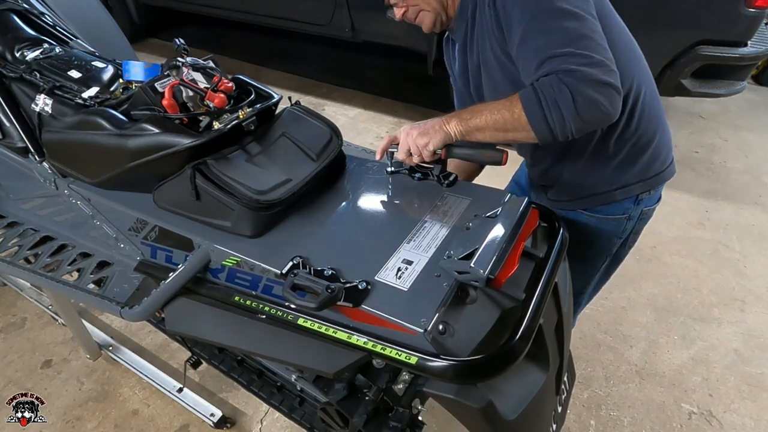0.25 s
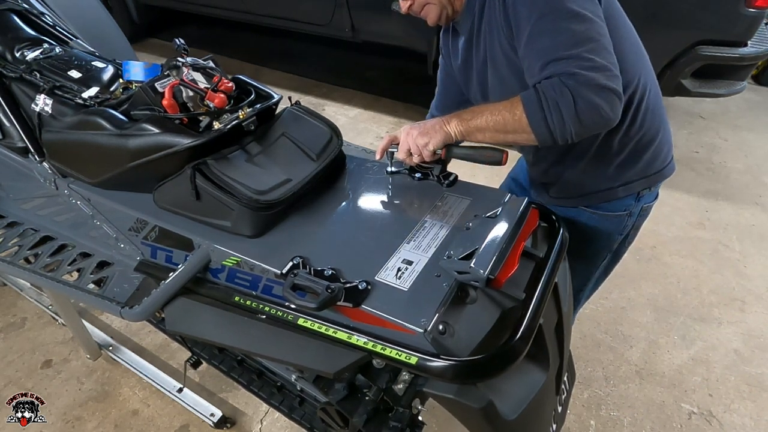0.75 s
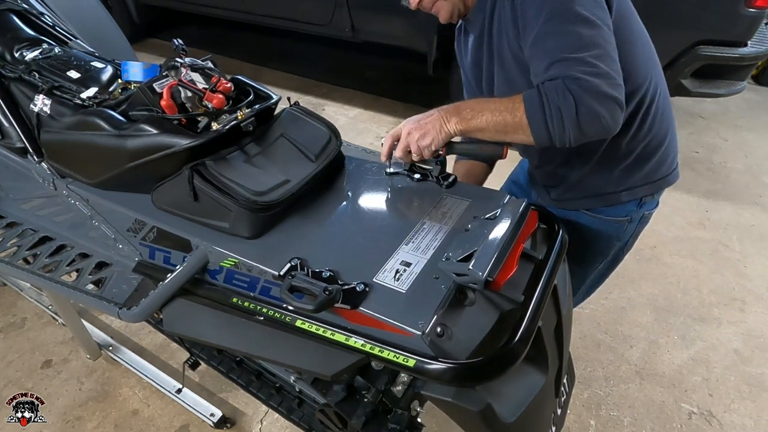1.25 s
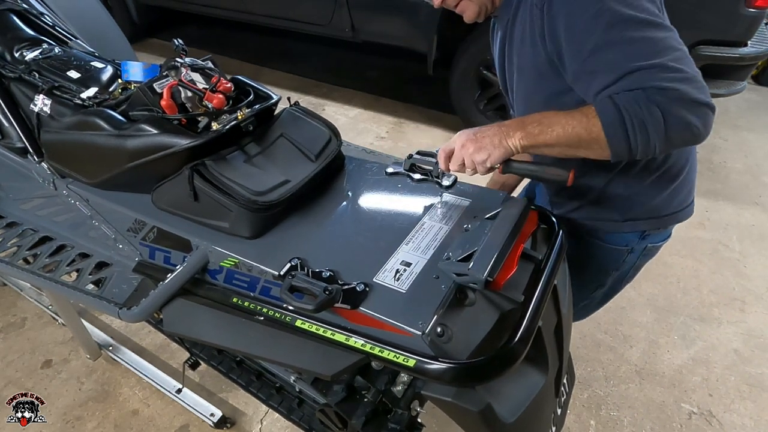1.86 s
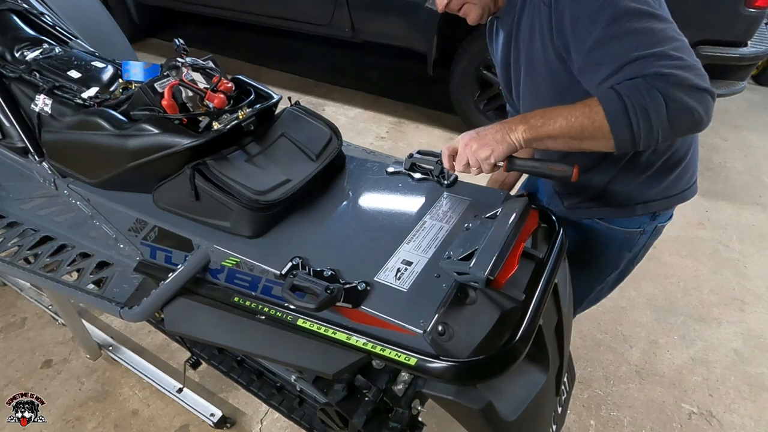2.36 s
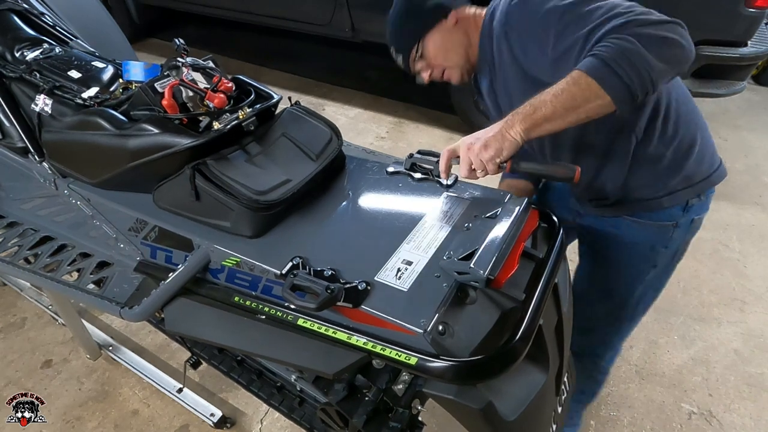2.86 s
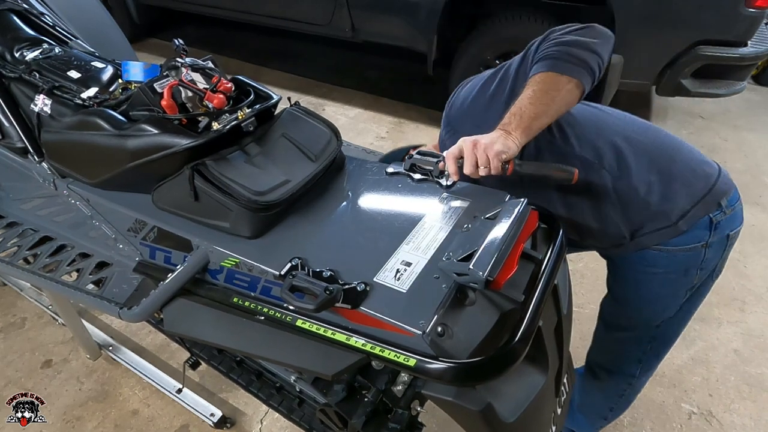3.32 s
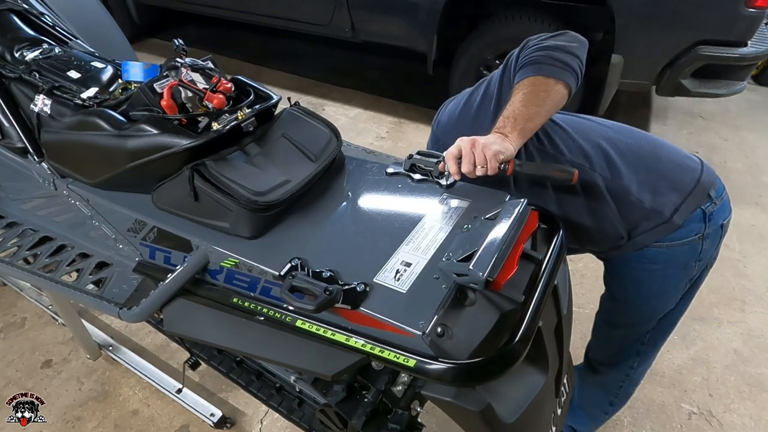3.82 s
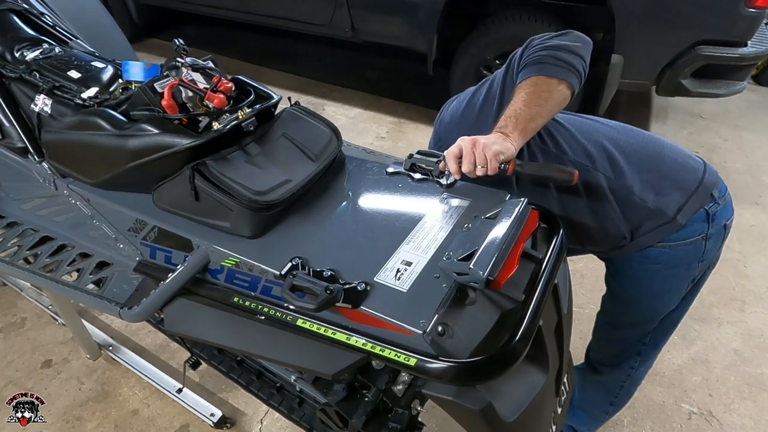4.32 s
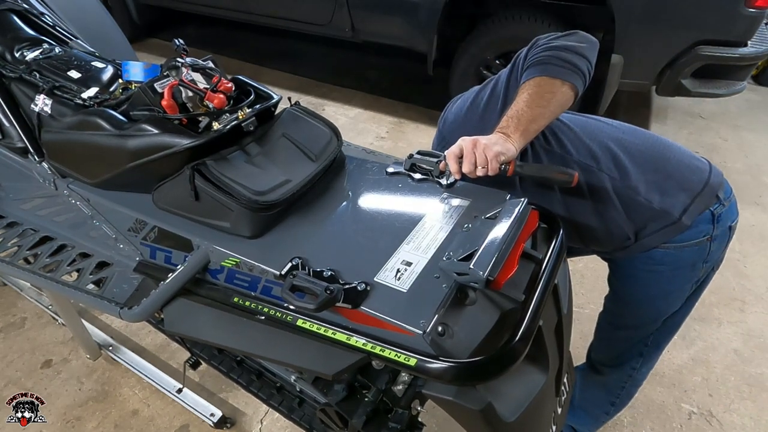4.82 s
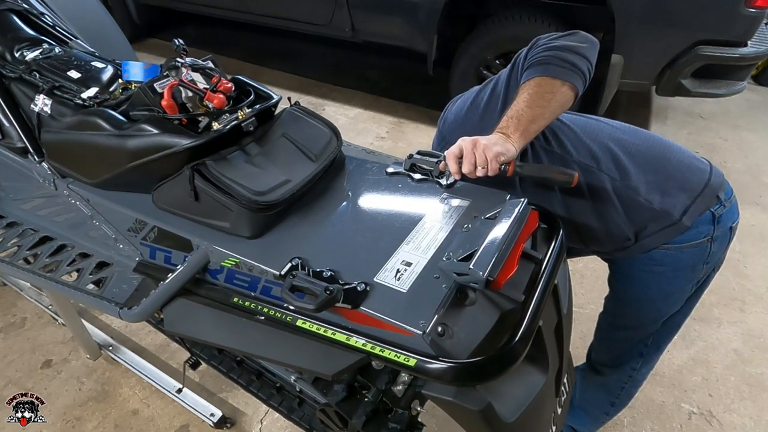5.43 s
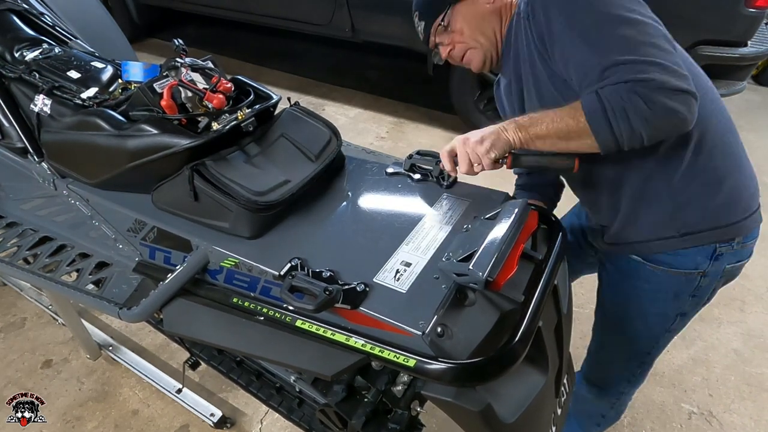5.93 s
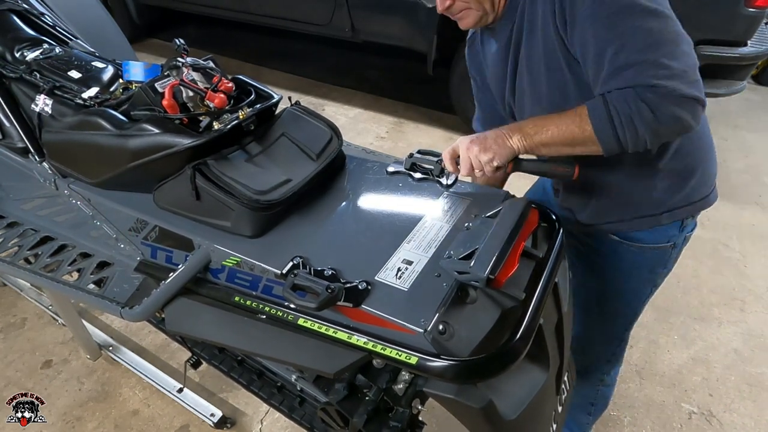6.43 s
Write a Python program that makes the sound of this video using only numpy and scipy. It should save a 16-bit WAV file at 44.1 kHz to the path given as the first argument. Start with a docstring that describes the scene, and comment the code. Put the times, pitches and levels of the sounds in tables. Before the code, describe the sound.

A hand ratchet and socket clank, click and scrape irregularly on a hollow sheet-metal deck in a bare garage.

```python
"""A short scrape runs into a steel clank: a hand ratchet and its socket knock, click and slide on a
hollow sheet-metal vehicle deck in a bare garage. Each knock booms in the deck, rings the steel parts
and dies in the room; the sliding socket adds grainy friction. A mains hum and a hiss lie underneath.
Near the end the sound drops out, returns faintly and flickers."""
import sys
import numpy as np
from scipy import signal
from scipy.fft import rfft, irfft, next_fast_len
from scipy.io import wavfile
from scipy.ndimage import map_coordinates

SR = 44100
rng = np.random.default_rng(int(sys.argv[2]) if len(sys.argv) > 2 else 0)


def generate_wav(signal):
    """Clip the signal to [-1, 1] and save it as 16-bit WAV at the path in sys.argv[1]."""
    frames = np.transpose(np.atleast_2d(signal))
    scaled = np.clip(frames, -1, 1) * 32767
    pcm = np.round(scaled).astype(np.int16)
    wavfile.write(sys.argv[1], SR, pcm)


N = 294586
FFT_SIZE = 2 ** 16
BIN_HZ = np.fft.rfftfreq(FFT_SIZE, 1 / SR)

# Knock cues; levels are faders ahead of each layer's trim: (time [s], deck [dB], frame [dB], plate [dB],
# handle [dB], socket [dB], pawl [dB], tip [dB], tilt toward each part's higher modes [dB],
# favoured pitch [Hz], room send [dB])
KNOCK_CUES = [(0.084, -28.5, -24.5, -29.5, -21, -20, -19.5, -24, 1.5, 1830, -2.5),
              (0.2757, -68, -77, -67, -61, -33, -35.5, -35, 4, 5550, -9.5),
              (0.422, -35, -55, -39, -30, -26.5, -31.5, -53, -2, 1750, 1.5),
              (0.4342, -26, -34, -33.5, -33, -31, -25.5, -39, 5, 2110, -10.5),
              (0.4567, -50.5, -36, -36, -29, -32, -38, -62, 9.5, 3070, -5),
              (0.963, -48.5, -39, -44, -56, -66, -67, -82.5, 3, 427, -3.5),
              (1.0365, -22, -35.5, -57, -62, -65, -70, -85, -4, 338, -2),
              (1.056, -39, -35, -42.5, -47.5, -55, -61.5, -78, 0.5, 616, -5),
              (1.0864, -35.5, -31, -46, -45, -62, -73, -82.5, -5, 338, -1.5),
              (1.1566, -21.5, -27, -27.5, -35, -33, -30, -41.5, 10, 620, -13),
              (1.1657, 1, -21, -28, -15.5, -11, -4.5, -28.5, 2, 3340, -6.5),
              (1.1835, -19, -10, -20, -15, -16, -30, -51.5, 1.5, 3100, -3.5),
              (1.2097, -2, -15, -21, -16, -17, -45, -54.5, 7, 628, -2),
              (1.2297, -4, -5.5, -9, -1, -2.5, -7, -45.5, 0, 987, -6),
              (1.3887, -45, -46, -26.5, -20, -24, -40, -70.5, 5, 1750, -9),
              (1.4849, -56.5, -53, -55, -45, -43, -38, -63, 7, 6600, -10.5),
              (1.569, 8, -10.5, -27.5, -9, 0, -5.5, -16, 4, 2110, 0.5),
              (1.9092, -21, -17.5, -50, -32, -34.5, -48, -47, -3.5, 429, -5.5),
              (2.1607, -4.5, -6.5, -4, -5, -7, -28, -31.5, 0, 431, -3),
              (2.3413, -15.5, -18, -15, -12.5, -25, -53, -53, 1.5, 620, -5.5),
              (2.358, -9, -14, -16, -17.5, -24.5, -51, -55.5, -1, 419, -7.5),
              (2.5573, 1, -7, -7.5, -8, -12.5, -14.5, -55.5, -1.5, 440, -4),
              (2.7559, -23, -26, -36.5, -27, -33, -40, -45, -1, 4420, -2),
              (2.9971, -41, -27, -49, -42, -43, -31.5, -40, 1, 545, 3),
              (3.0275, -36.5, -38, -47, -33, -30.5, -29, -40, 5, 3880, 3),
              (3.1398, -25, -34, -33, -37, -46, -46, -46, 2.5, 620, -11.5),
              (3.5104, -63, -64, -40.5, -46.5, -39, -41, -51, 1.5, 1750, 10.5),
              (4.0142, -64, -43.5, -32, -36, -30, -34.5, -34.5, -1, 1020, 7),
              (4.1523, -48, -41, -27.5, -30.5, -33, -37, -67, -2, 784, -2),
              (4.7649, -25, -30, -43, -18.5, -20.5, -33, -22.5, -1, 3100, 3.5),
              (4.7946, 1.5, -8, -4.5, -4.5, -5, -11, -11, -0.5, 1280, 0),
              (5.0576, -62.5, -59, -31, -34, -29, -30, -47.5, 3, 810, -1.5),
              (5.2174, -53, -35, -36, -49, -44, -60, -49, 5, 3100, -17),
              (5.2279, -4.5, -11, -8.5, -11.5, -11, -19.5, -14, -2, 1870, -0.5),
              (5.529, -5, -12, -12, -14.5, -14.5, -27.5, -22.5, -2, 3500, -4),
              (5.7512, -6, -29, -15.5, -28, -15.5, -43, -36.5, -1.5, 1260, 4),
              (5.7589, -10.5, -13.5, -11, -6, -4.5, -8.5, -6.5, -2.5, 1260, -1.5),
              (5.7679, 3, -10, -14, -5, -4, -7.5, -26, 1.5, 2120, -4.5)]


def knocks():
    """The tool hits the deck: a rattling contact and its reverb ring the steel over a hollow boom."""
    out = np.zeros(N + SR)
    t = np.arange(SR // 16) / SR
    for start, deck_db, *part_db, tilt_db, favoured_hz, room_db in KNOCK_CUES:
        contact = rng.standard_normal(len(t)) * amp(-60 * t / 0.026)
        contact[0] += 5  # first touch
        reverb = garage(room_db)
        blow = reverb.copy()
        blow[:len(t)] += contact / np.linalg.norm(contact)
        ring = steel_ring(blow, part_db, tilt_db, favoured_hz)
        boom = amp(deck_db + 5.5) * deck_boom(reverb)
        out[round(start * SR):][:FFT_SIZE] += ring + boom
    return out[:N]


# Ringing modes of each steel part: (pitch [Hz], width [Hz], relative level [dB])
FRAME_MODES = [(333, 55, -3), (452, 90, 1), (542, 70, -3.5), (638.4, 120, -2)]
PLATE_MODES = [(807.4, 70, -1.5), (1026, 140, -1.5), (1260, 180, 0)]
HANDLE_MODES = [(1737, 162, -1.6), (2075, 210, -1)]
SOCKET_MODES = [(3075, 600, 0), (3514, 200, -3.5), (4006, 550, -6.5)]
PAWL_MODES = [(4590, 460, -1), (5200, 490, -2.5), (5670, 480, -5)]
TIP_MODES = [(6510, 500, -6), (7400, 550, -8), (9450, 670, -3.5), (10580, 520, 0.5), (12700, 1400, -8)]


def steel_ring(blow, part_db, tilt_db, favoured_hz, lift_db=11, lift_octaves=0.15):
    """Six steel parts ring from one blow; the contact point tilts their modes and favours one pitch."""
    parts = (FRAME_MODES, PLATE_MODES, HANDLE_MODES, SOCKET_MODES, PAWL_MODES, TIP_MODES)
    socket_db = part_db[3]
    power = amp(socket_db - 1.5) ** 2 * mode_power(2000, width_hz=2000)  # broad clack under the socket
    for modes, fader_db in zip(parts, part_db):
        tilts = np.linspace(-tilt_db, tilt_db, len(modes))
        for (hz, width, mode_db), tilt in zip(modes, tilts):
            db = fader_db + mode_db + tilt - 4
            lift = lift_db * np.exp(-(np.log2(hz / favoured_hz) / lift_octaves) ** 2)
            power += amp(db + lift) ** 2 * mode_power(hz, width)
            power += amp(db + 1) ** 2 * mode_power(hz, 2.51 * width)  # cluster of lesser modes
    return excite(blow, power)


def deck_boom(reverb):
    """The heavy deck feels one push and booms mostly through the room; scaled to unit energy."""
    push = reverb.copy()
    push[0] += .6
    lesser_modes = amp(-9.5) ** 2 * mode_power(270, width_hz=70)
    boom = excite(push, mode_power(219.5, width_hz=46.5) + lesser_modes)
    return boom / np.linalg.norm(boom)


# Slide cues: (time [s], rise [s], hold [s], fall [s], level before trim [dB], rumble over friction [dB])
SCRAPE_CUES = [(0.0, .076, 0.0051, 0.0048, -46.5, 10), (0.947, 0.13, 0.42, .006, -75, 17.5),
               (1.903, 0.029, 0.033, 0.11, -29, -9), (2.315, 0.017, 0.026, 0.0039, -43.5, 11.5),
               (2.14, .014, .002, .004, -44, 7.5), (2.541, 0.019, .002, 0.005, -30, 4.5),
               (2.716, 0.029, 0.049, 0.047, -60.5, 21.5), (2.956, 0.018, .012, 0.09, -42.5, 1.5),
               (3.003, 0.017, 0.0097, 0.082, -32.5, -12.5), (3.049, 0.019, 0.062, 0.76, -49, -2),
               (4.74, .018, 0.0022, .004, -44, -6), (5.717, 0.046, 0.0025, .004, -35.5, 10),
               (5.954, .006, 0.077, .2, -40, -1.5)]
# Tone of steel sliding on steel: (frequency [Hz], relative level [dB])
FRICTION_EQ = [(410, -38.5), (700, -13.5), (848, -6), (1440, -6), (1670, -2.5), (2980, -1), (6950, -15),
               (9210, -24), (10700, -14), (15000, -57)]


def scrapes(trim_db=-12):
    """The socket slides for at most 0.6 s: grainy friction with the deck rumbling under it."""
    out = np.zeros(N + 2 * SR)
    t = np.arange(SR * 6 // 10) / SR
    for start, rise, hold, fall, db, rumble_db in SCRAPE_CUES:
        noise = rng.standard_normal(len(t))
        grain_db = 3.8 * rng.standard_normal(len(t) // 40 + 1).repeat(40)[:len(t)]
        friction = unit_rms(filtered(noise * amp(grain_db), lambda f: amp(curve(FRICTION_EQ, f))))
        drag = rng.standard_normal(len(t))
        rumble = unit_rms(filtered(drag, lambda f: resonance(f, 240, 90) + .44 * resonance(f, 520, 200)))
        envelope = swell(t, 0, rise, hold, fall) * amp(db + trim_db)
        slide = envelope * (friction + amp(rumble_db) * rumble)
        room = garage(send_db=-1.5)
        room[0] += 1  # direct sound
        heard = signal.fftconvolve(slide, room)
        out[round(start * SR):][:len(heard)] += heard
    return out[:N]


# Reverb decay: (frequency [Hz], time to fall 60 dB [s])
REVERB_TIMES = [(150, 0.43), (400, 0.84), (1000, 0.76), (2500, 0.64), (6000, 0.63), (11000, 0.26)]
# Early echoes off the near walls: (mean delay [s], level against the tail [dB])
WALL_ECHOES = [(.004, -5.5), (.009, -8), (.013, -5.5), (.022, -13), (.031, -17.5)]


def garage(send_db):
    """A fresh room response: near-wall echoes and a diffuse tail that swells with the far wall."""
    hz, t, noise = signal.stft(rng.standard_normal(SR * 3 // 4), SR, nperseg=256)
    far_delay_s, far_spread_s, far_db = 0.074, 0.15, 4.5
    far_wall = amp(far_db * np.exp(-((t - far_delay_s) / far_spread_s) ** 2))
    build_up = 1 - np.exp(-t / 0.0013)
    decay = amp(-60 * t / curve(REVERB_TIMES, hz)[:, None])
    tail = signal.istft(noise * decay * build_up * far_wall, SR, nperseg=256)[1]
    response = tail / np.linalg.norm(tail)
    for delay, db in WALL_ECHOES:
        echo = rng.standard_normal(48)  # clutter scatters each echo over a millisecond
        arrival = round(delay * rng.uniform(.75, 1.25) * SR)
        response[arrival:][:48] += amp(db) * echo / np.linalg.norm(echo)
    return amp(send_db) * response


# Tone of the hiss as heard after the microphone: (frequency [Hz], relative level [dB])
HISS_EQ = [(35, -48), (60, -31.5), (96, -29.5), (161, -14.5), (207, -13.5), (242, -3.5), (265, -17),
           (355, -11), (486, -13), (609, -12.5), (1170, -17), (2630, -23), (6050, -33.5), (8100, -43),
           (9000, -57.5), (10600, -42), (12500, -54), (16000, -65.5)]
# Mains hum: (pitch [Hz], peak level before trim and waver [dB])
HUM_TONES = [(240, -73)]


def room_tone(hiss_db=-60.5, hum_trim_db=-1.5):
    """The bed under the knocks: steady room hiss and a wavering mains hum."""
    t = np.arange(N) / SR
    hiss = filtered(rng.standard_normal(N), lambda f: amp(curve(HISS_EQ, f) - curve(MIC_EQ, f)))
    waver_db = 1.1 * map_coordinates(rng.standard_normal(64), [t * 8])
    hum = sum(amp(db + hum_trim_db + waver_db) * np.sin(2 * np.pi * hz * t) for hz, db in HUM_TONES)
    return amp(hiss_db) * unit_rms(hiss) + hum


def scene():
    """Knocks, scrapes and room tone reach one microphone, copied to both channels."""
    return np.tile(knocks() + scrapes() + room_tone(), (2, 1))


# Brief returns after the dropout: (time [s], rise [s], hold [s], fall [s], level [dB], growth [dB/s])
FLICKERS = [(5.887, 0.0138, 0.0019, 0.015, -31.5, 1.5), (5.941, .02, 0.34, 0.046, -13, 55.5),
            (6.37, .02, .01, .05, -25.5, 3), (6.526, 0.032, 0.0066, 0.031, -8, 5),
            (6.629, 0.017, .05, .01, -10, 3)]


def dropout(open_db=2.5, cut_db=-41, cut_at_s=5.826, cut_fall_s=0.0047, sink_db_per_s=151):
    """The overall gain holds, drops suddenly and keeps sinking, then flickers back."""
    t = np.arange(N) / SR
    since_cut = np.maximum(t - cut_at_s, 0)
    drop_db = (cut_db - open_db) * np.minimum(since_cut / cut_fall_s, 1)
    gain = amp(open_db + drop_db - sink_db_per_s * since_cut)
    for start, rise, hold, fall, db, growth in FLICKERS:
        grown_db = growth * np.clip(t - start, 0, rise + hold)
        gain += swell(t, start, rise, hold, fall) * amp(db + grown_db)
    return gain


# Microphone colour: (frequency [Hz], gain [dB])
MIC_EQ = [(30, -31), (100, -11.5), (160, -5), (220, -0.5), (7000, -2.5), (8500, -8), (9050, -22.5),
          (9600, -10), (11500, -13.5), (13000, -20.5), (15500, -34)]
# Slight difference between the channels: (frequency [Hz], side gain against the middle [dB])
CHANNEL_DIFFERENCE_EQ = [(60, -34.5), (170, -51.5), (350, -58.5), (1500, -53.5), (3000, -54.5), (6000, -31),
                         (10000, -18), (14000, 1)]


def record(dry, ceiling=.75, top_hz=16400):
    """Microphone colour, soft overload, a slight difference between the two channels, the dropout and a treble
    cut-off."""
    coloured = filtered(dry, lambda f: amp(curve(MIC_EQ, f)))
    middle = coloured / (1 + np.abs(coloured / ceiling) ** 4) ** (1 / 4)
    hz, _, spectrum = signal.stft(middle[0], SR, nperseg=512)
    scrambled = spectrum * np.exp(2j * np.pi * rng.random(spectrum.shape))
    side = signal.istft(scrambled * amp(curve(CHANNEL_DIFFERENCE_EQ, hz))[:, None], SR, nperseg=512)[1][:N]
    stereo = (middle + [side, -side]) * dropout()
    return filtered(stereo, lambda f: f < top_hz)


def resonance(f, hz, width_hz):
    """Complex response of one mode at the frequencies f."""
    return 1j * f * width_hz / (hz * hz - f * f + 1j * f * width_hz)


def mode_power(hz, width_hz):
    """Power spectrum of a steep-skirted mode, with about the same energy at any width."""
    return SR / width_hz * np.abs(resonance(BIN_HZ, hz, width_hz)) ** 3.42


def excite(force, power):
    """Drive a body with this power spectrum so that it speaks at once (minimum phase)."""
    cepstrum = irfft(np.log(np.sqrt(power) + 1e-9))
    cepstrum[1:FFT_SIZE // 2] *= 2
    cepstrum[FFT_SIZE // 2 + 1:] = 0
    return irfft(rfft(force, FFT_SIZE) * np.exp(rfft(cepstrum)))


def filtered(x, response):
    """Shape x with a response given as a function of frequency."""
    n = x.shape[-1]
    size = next_fast_len(n + 8192)
    return irfft(rfft(x, size) * response(np.fft.rfftfreq(size, 1 / SR)), size)[..., :n]


def swell(t, start, rise, hold, fall):
    """Envelope from 0 to 1 with a curved rise and fall."""
    end = start + rise + hold + fall
    return np.clip(np.minimum((t - start) / rise, (end - t) / fall), 0, 1) ** 2


def curve(points, hz):
    """Read between (frequency, value) points on a log frequency axis."""
    point_hz, values = np.transpose(points)
    return np.interp(np.log(hz + 1), np.log(point_hz + 1), values)


def amp(db):
    """Decibels to gain."""
    return 10 ** (np.asarray(db) / 20)


def unit_rms(x):
    """Scale to an rms of 1."""
    return x / np.sqrt(np.mean(x ** 2) + 1e-20)


dry = scene()
out = record(dry)
generate_wav(out)
```